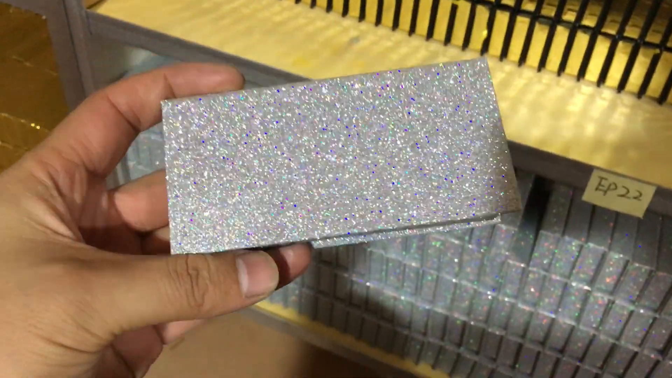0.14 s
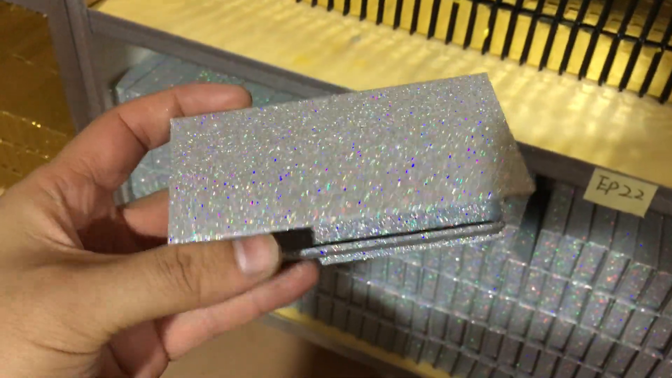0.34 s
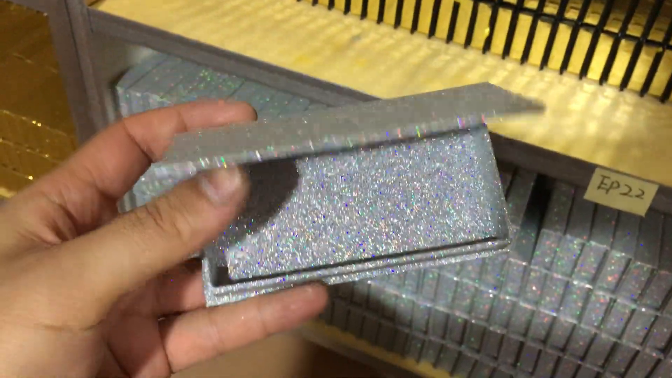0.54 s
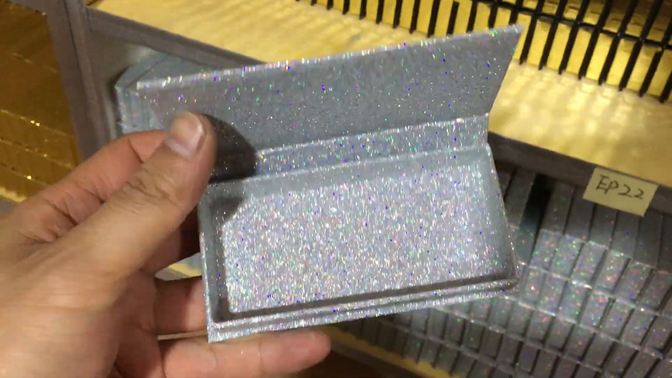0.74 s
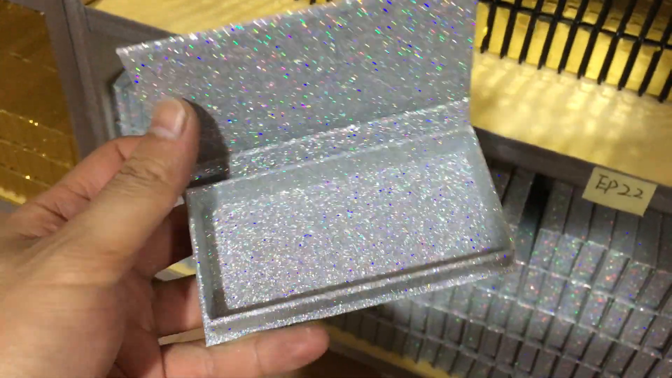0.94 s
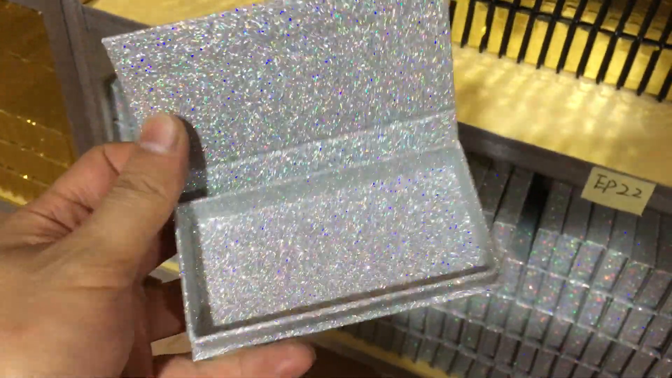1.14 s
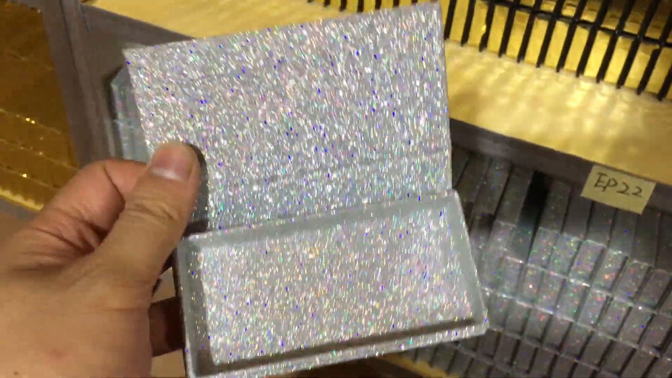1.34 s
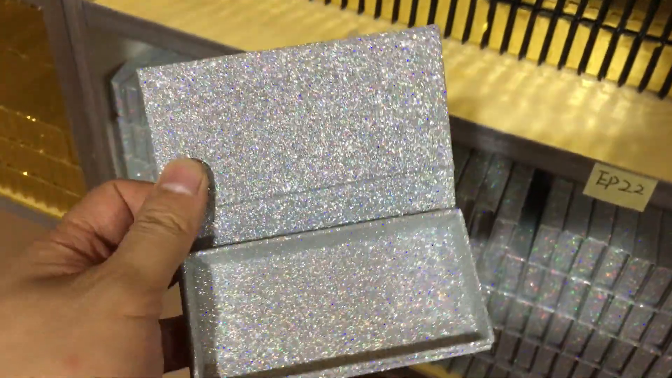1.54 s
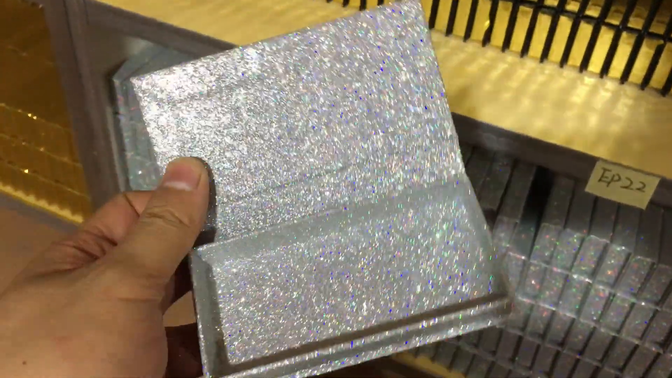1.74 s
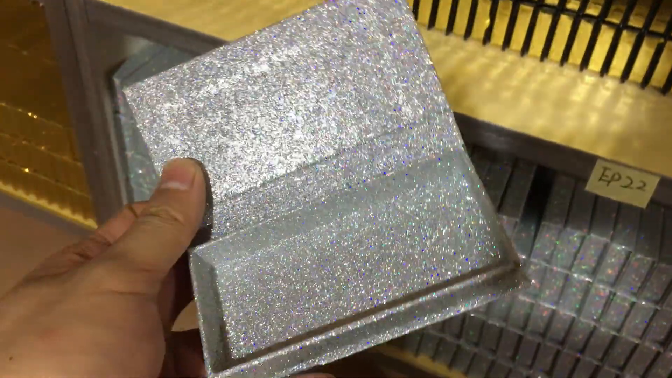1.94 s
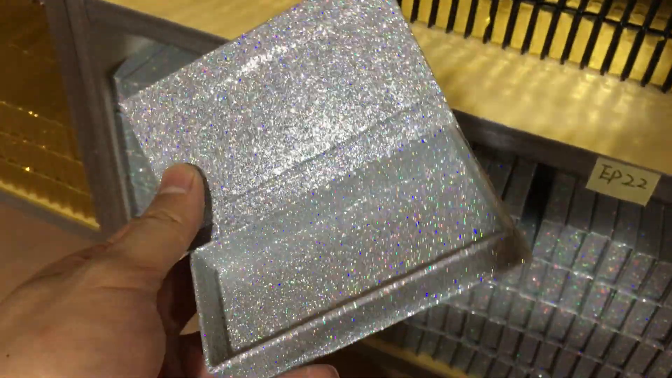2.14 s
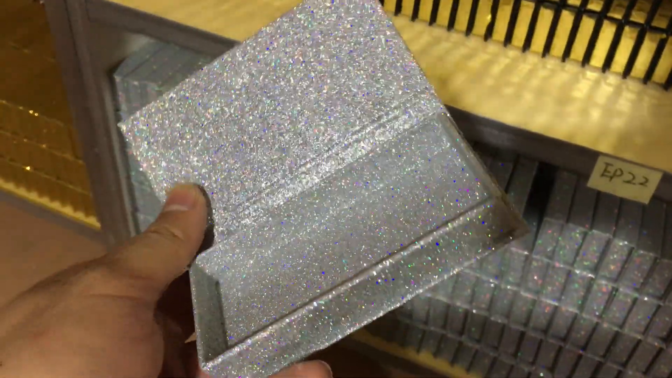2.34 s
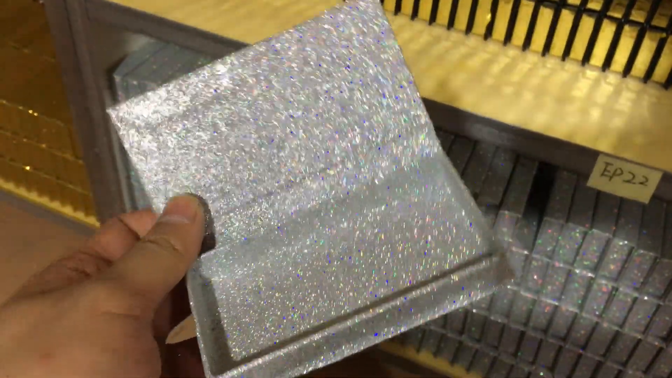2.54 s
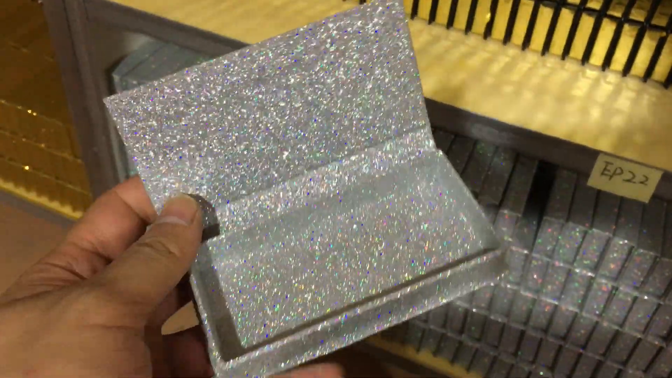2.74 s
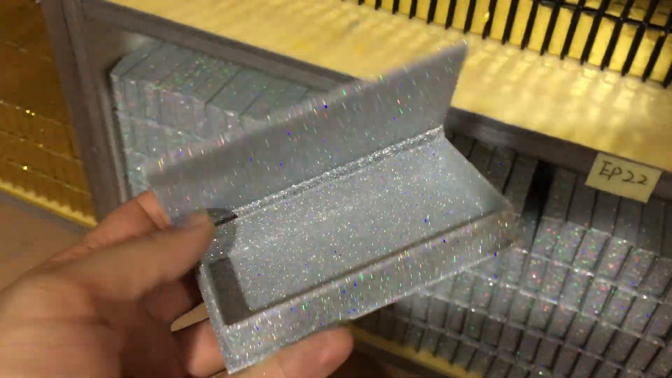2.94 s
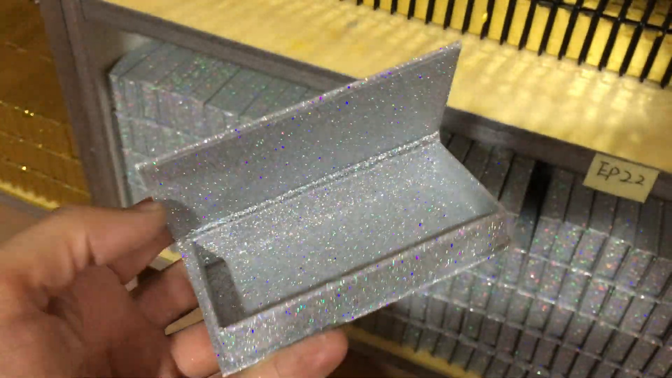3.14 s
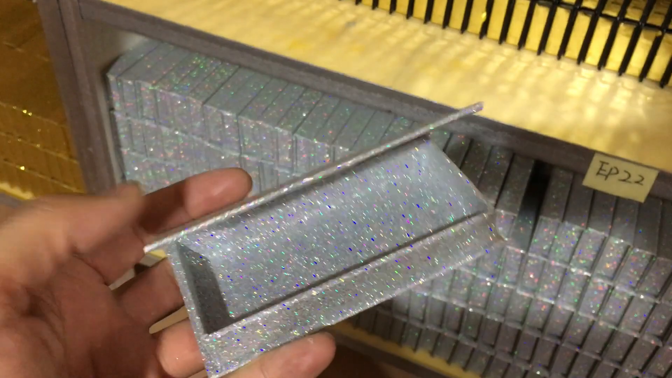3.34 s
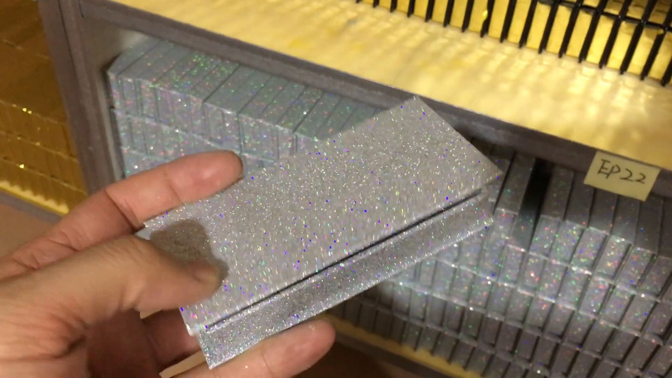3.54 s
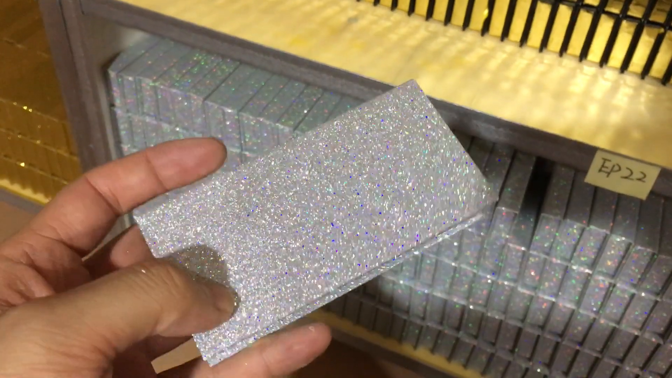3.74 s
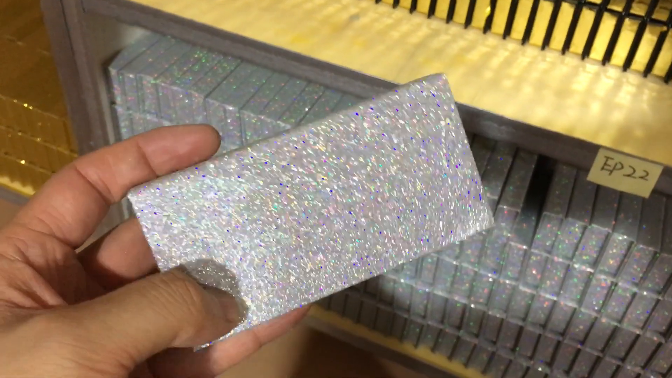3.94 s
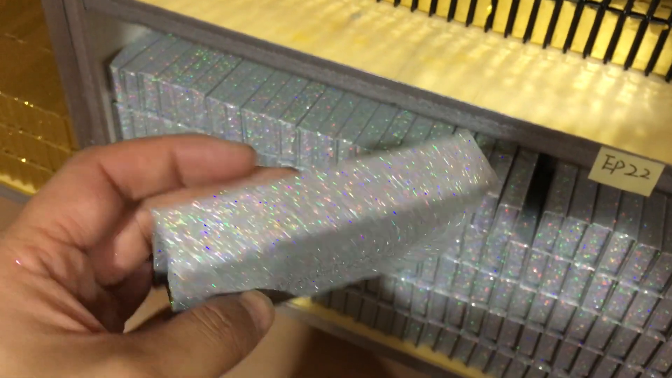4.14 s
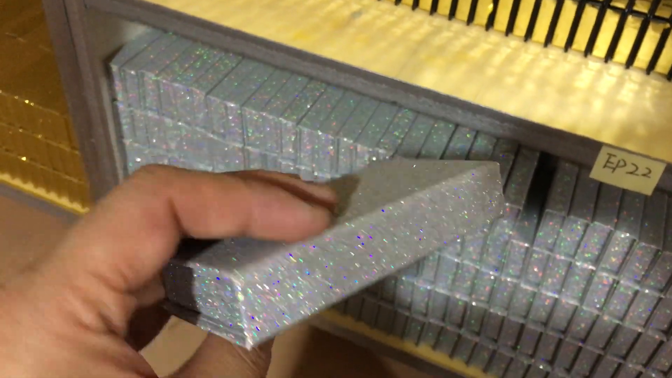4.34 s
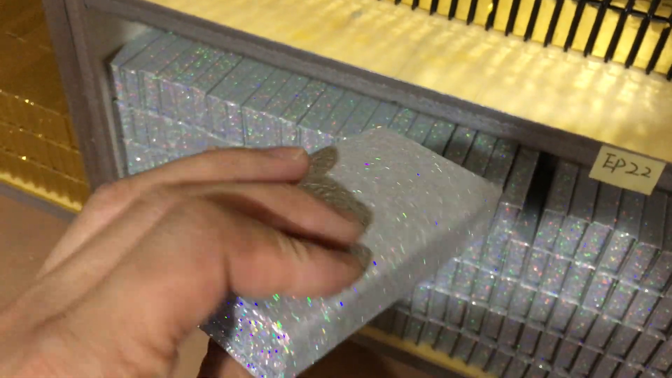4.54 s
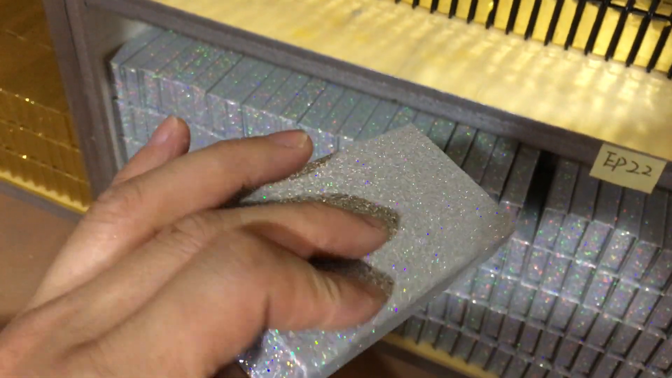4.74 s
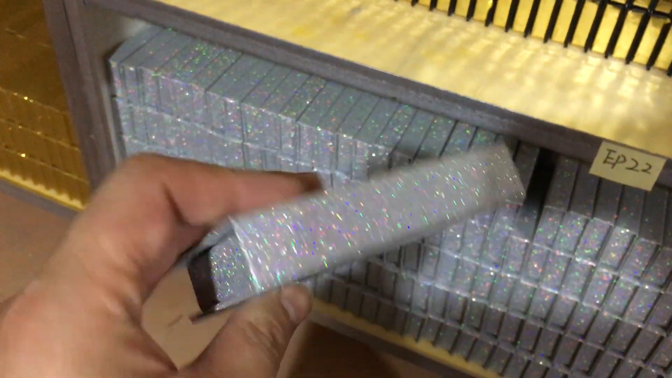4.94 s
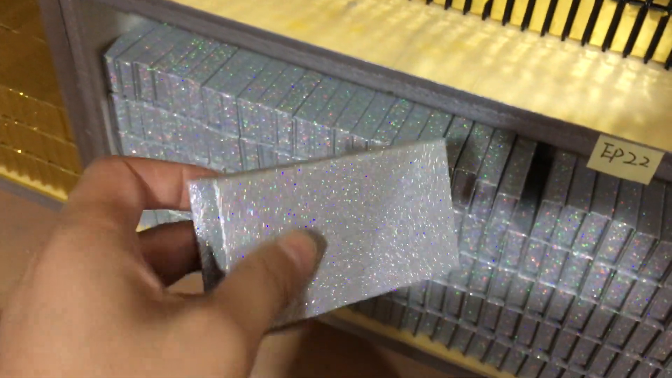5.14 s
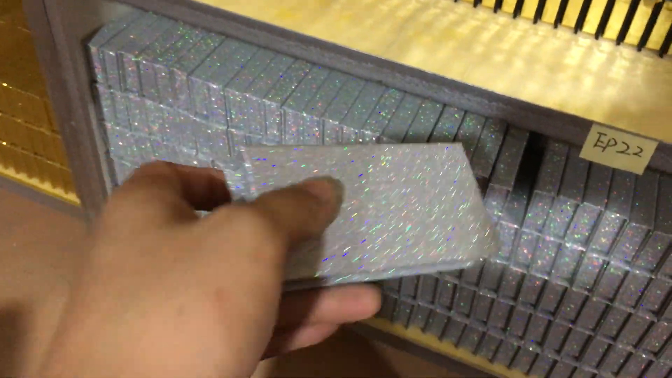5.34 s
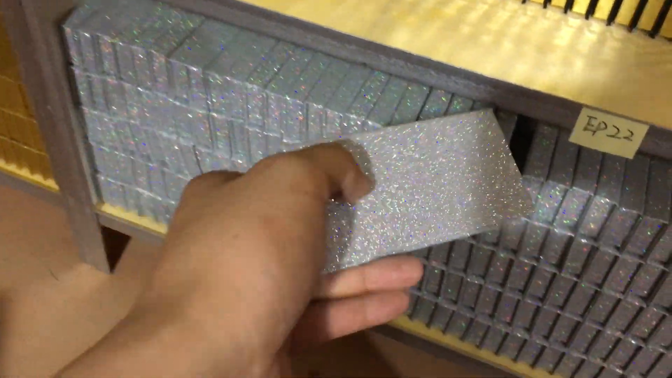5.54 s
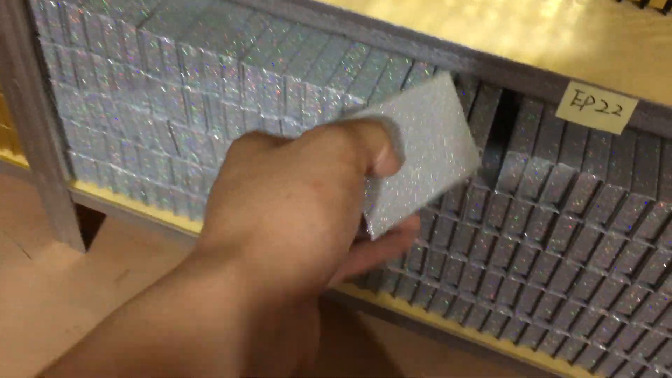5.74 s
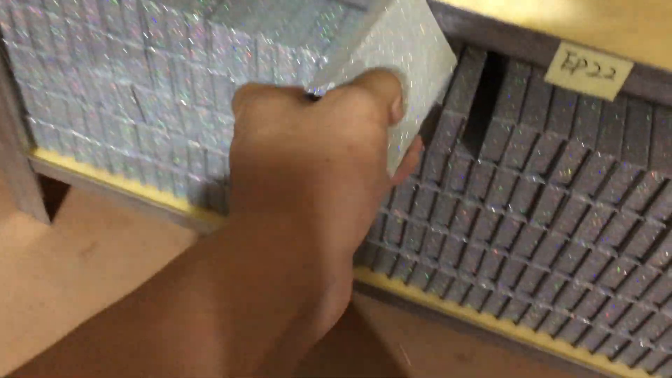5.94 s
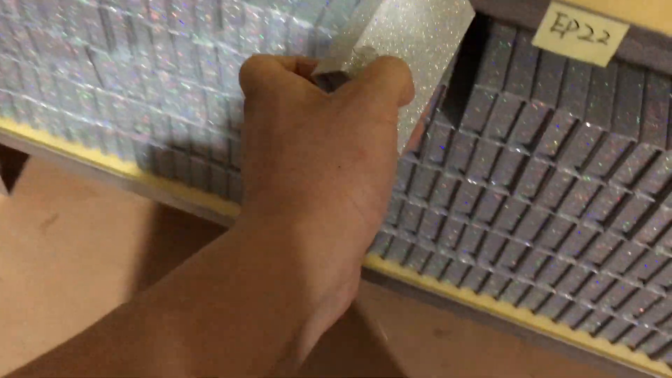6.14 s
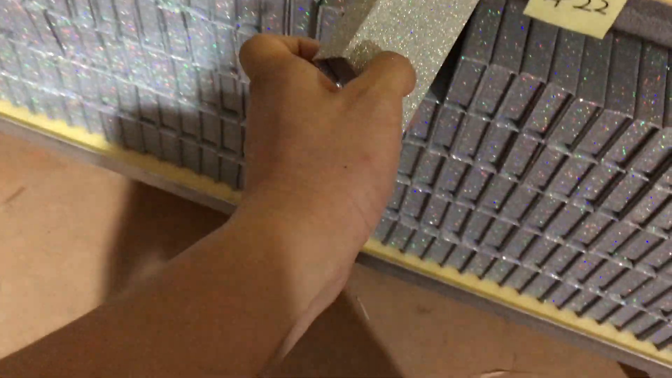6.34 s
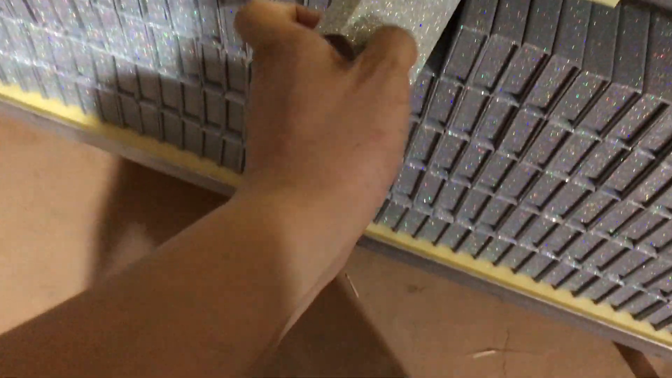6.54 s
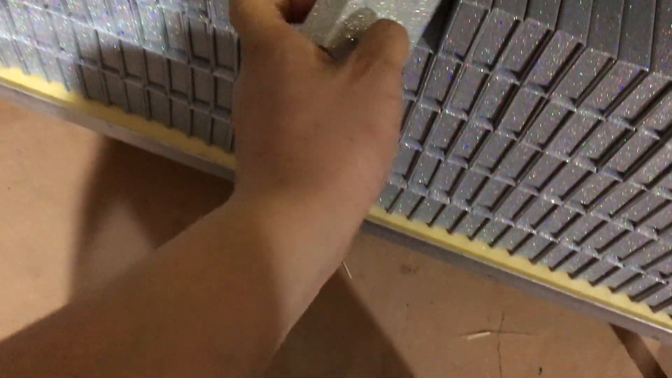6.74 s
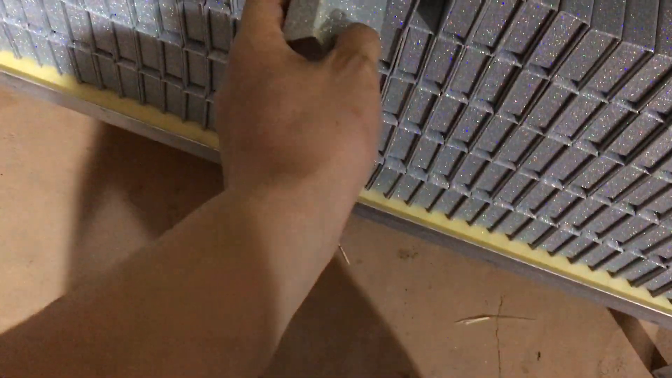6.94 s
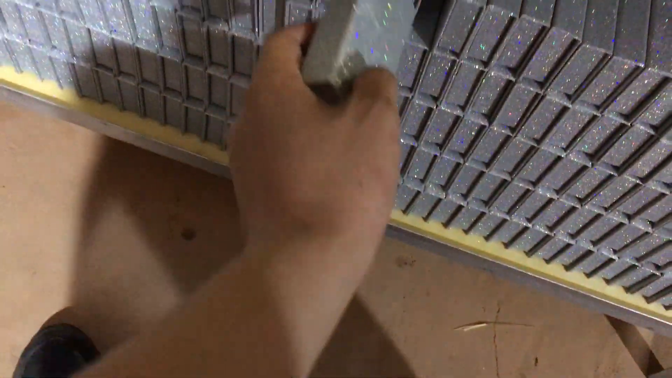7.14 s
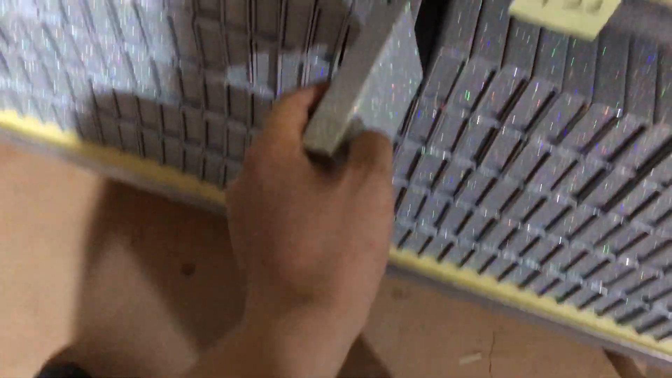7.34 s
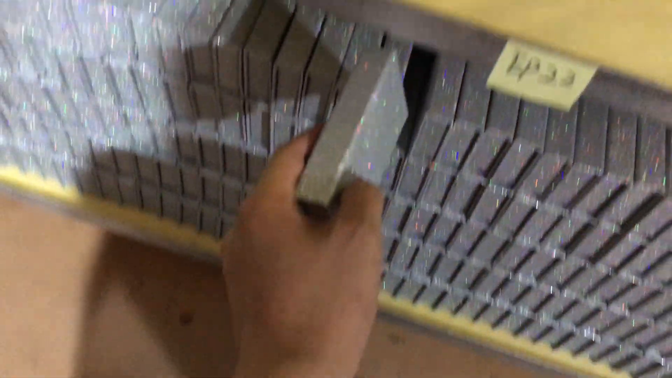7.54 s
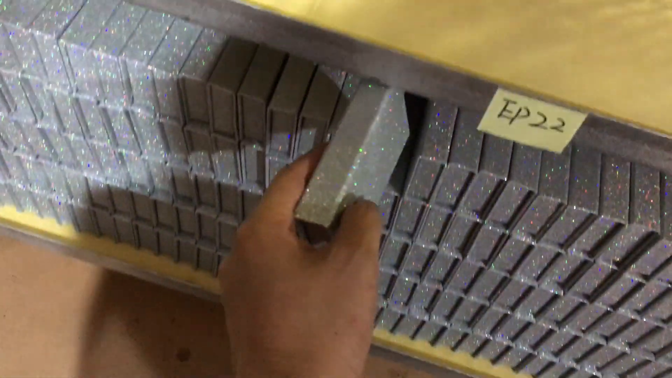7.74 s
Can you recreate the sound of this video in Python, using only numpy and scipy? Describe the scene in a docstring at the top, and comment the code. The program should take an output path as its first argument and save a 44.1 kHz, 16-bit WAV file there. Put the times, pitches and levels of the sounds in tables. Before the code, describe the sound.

Close and dry, fingers rub a small glitter-coated cardboard box with short raspy scuffs and light ticks. The lid closes with one loud hollow snap, followed by dull fingertip knocks and judders. Then, farther off in a reverberant storage aisle, a creak ratchets faster and breaks into single sharp cracks, while the box bumps and briefly scrapes into a packed stack. A faint low rumble and air noise lie beneath.

```python
"""Fingers rub and judder on a small glitter-coated cardboard box: catches of friction excite board and grain.
The box is opened, snapped shut, turned in the hand and pushed back into a packed shelf; blows ring its modes.
After a distant tick, something at the shelf creaks by stick and slip: slips quicken, then slow to single cracks.
A low rumble, a narrow tone of wavering phase and level, runs under steady air noise."""
import sys
import numpy as np
from scipy import signal
from scipy.fft import rfft, irfft
from scipy.io import wavfile
from scipy.ndimage import uniform_filter1d

SR = 44100
rng = np.random.default_rng(int(sys.argv[2]) if len(sys.argv) > 2 else 0)


def dump(signal):
    """Clip the signal to [-1, 1] and save it as 16-bit WAV at the path in sys.argv[1]."""
    limited = np.clip(np.atleast_2d(signal).T, -1, 1)
    pcm = np.round(limited * 32767).astype(np.int16)
    wavfile.write(sys.argv[1], SR, pcm)


N = 343539
T = np.arange(N) / SR  # time in s
HZ = np.fft.rfftfreq(N, 1 / SR)

# All levels in the tables are relative; each source sets its own overall gain.
# Strokes of fingers on the box, then soft scuffs of the box as it slides:
# [fastest_s, rise_s, fall_s, board_level_db, hiss_level_db, board_centre_hz]
RUB_STROKES = [(0.35, .014, 0.009, -57.5, -66, 1510), (0.399, 0.015, 0.0097, -53, -62.5, 1580),
               (0.432, .005, .015, -54, -69, 1600), (0.471, 0.039, 0.075, -53.5, -59, 1440),
               (0.56, 0.06, 0.26, -63.5, -70, 1600), (0.772, 0.067, 0.05, -61.5, -57.5, 1470),
               (0.82, 0.015, 0.044, -61, -58.5, 1160), (0.9, 0.034, 0.15, -65.5, -65, 1500),
               (1.065, 0.074, .03, -62.5, -61, 1650), (1.099, 0.017, 0.017, -49.5, -52, 1770),
               (1.178, 0.038, 0.034, -79, -55.5, 1570), (1.253, 0.015, 0.032, -60.5, -58, 1450),
               (2.16, 0.035, 0.15, -71, -73.5, 915), (2.322, 0.038, 0.032, -70.5, -65, 1130),
               (2.43, 0.095, 0.18, -74, -71, 1200), (2.66, 0.079, 0.14, -56.5, -59.5, 1700),
               (2.78, 0.12, 0.49, -62.5, -86, 1470), (2.925, 0.044, 0.056, -54, -62.5, 1550),
               (2.963, 0.034, 0.045, -58.5, -57.5, 990), (3.052, 0.025, 0.14, -56.5, -66, 1120),
               (3.2, 0.07, 0.036, -68.5, -68, 1210), (3.333, 0.021, 0.011, -52, -54.5, 1040),
               (3.89, 0.033, 0.044, -67, -56.5, 1300), (3.929, 0.032, 0.059, -55.5, -60, 1050),
               (4.088, 0.026, .055, -50.5, -64, 894), (4.18, 0.083, 0.055, -46.5, -61, 945),
               (4.272, 0.023, 0.0099, -59, -60, 1070), (4.483, 0.032, .018, -66, -64.5, 935),
               (4.547, .018, 0.031, -47, -50, 1140), (4.66, 0.015, 0.027, -54.5, -59, 950),
               (4.695, 0.047, 0.037, -66, -59.5, 1075), (4.97, 0.079, 0.26, -78, -72, 950),
               (5.1, 0.051, 0.075, -68.5, -62.5, 1060), (5.222, .04, 0.058, -57, -52.5, 990),
               (5.305, 0.054, 0.048, -53.5, -55.5, 1050), (6.06, 0.078, 0.11, -67, -62.5, 780),
               (6.145, 0.0069, 0.086, -53.5, -65, 950), (6.272, 0.026, 0.014, -54, -65.5, 880),
               (7.22, 0.18, .1, -79, -72.5, 906), (7.328, 0.034, 0.027, -53, -65, 860),
               (7.54, 0.62, 0.23, -67, -65.5, 900)]
# Spectrum of the rubbed board: [frequency_hz, level_db]
BOARD_SPECTRUM = [(60, -25), (170, -14), (320, -3), (520, 5.5), (900, 2.5), (2100, -1), (2800, -21.5),
                  (3800, -9), (6000, -35)]
# Spectrum of the hissing glitter grains: [frequency_hz, level_db]
GLITTER_SPECTRUM = [(1500, -7.5), (3000, 0), (4200, -2.5), (5200, -5), (6500, -4), (7600, -8.5), (9200, -7),
                    (10600, -17), (12000, -10), (16000, -29)]
# Finest hiss of the outer coating: [frequency_hz, level_db]
FIZZ_SPECTRUM = [(7000, -26), (11000, -1), (14500, -4), (16000, 4)]
# Strokes of the box scraping in between its neighbours: [fastest_s, rise_s, fall_s, board_level_db, hiss_level_db]
SHOVE_STROKES = [(6.836, 0.034, 0.046, -36.5, -43), (6.872, 0.0066, 0.036, -36, -41.5),
                 (6.907, 0.0088, 0.013, -34.5, -35)]
# Spectrum of the shaken stack: [frequency_hz, level_db]
STACK_SPECTRUM = [(59, -49), (100, -27), (174, 4), (264, -19), (314, -10), (530, -15.5), (649, -6.5),
                  (708, -11.5), (807, 3), (989, -20), (1060, -8), (2160, -12.5), (2890, -32), (3200, -45),
                  (4160, -58), (7040, -120)]
# Spectrum of the hiss between box and stack: [frequency_hz, level_db]
STACK_HISS_SPECTRUM = [(1760, -24), (3000, -14), (3330, 7.5), (4110, -5.5), (4600, 2), (7780, -10.5),
                       (9140, -3), (10300, -12), (11500, -6), (14400, -20), (16000, -20)]
# Thin resonances of the grinding edges: [frequency_hz, width_hz, level_db]
EDGE_RESONANCES = [(3080, 38, -11), (3390, 65, 0), (4535, 107, 4), (5150, 74, -6), (6540, 82, -13)]
# Lid snapping shut, nail ticks and fingertip knocks: [start_s, peak_level_db, treble_share_db]
TAP_BLOWS = [(0.428, -47, 0), (0.576, -49, 3), (0.674, -51, 0), (0.814, -41.5, -12), (1.007, -43.5, -0.5),
             (1.091, -40.5, 0), (1.244, -45, -1), (2.117, -53.5, -4), (2.425, -48, 0), (3.036, -44, -7),
             (3.323, -34, -2.5), (3.335, -34.5, 0), (3.481, -47, 0), (3.704, -8.5, -6), (4.065, -33.5, -29),
             (4.082, -30.5, -28), (4.17, -27.5, -32), (4.217, -34, -12), (4.293, -54, 0), (4.364, -41, -2),
             (4.427, -45, -5)]
# Spells of soft fingertip slips as the grip shifts: [start_s, end_s, mean_rate_per_s, peak_level_db]
JUDDER_SPELLS = [(1.802, 2.12, 13, -60.5), (4.091, 4.21, 65, -40), (4.369, 4.51, 35, -53)]
# Modes of the hollow box: [frequency_hz, level_db, t60_s]
BOX_MODES = [(255, -9.5, 0.064), (360, -9, 0.048), (703, 4.5, 0.028), (880, 7.5, 0.02), (1080, -12.5, 0.12),
             (1300, 1, 0.0021), (1700, -6, 0.024), (1930, -18, 0.018), (2300, 5.5, 0.003),
             (3036, -3.5, 0.012), (3590, 0, 0.01), (3740, -0.5, 0.014), (5200, -27, 0.0028),
             (6000, -14, 0.0066), (7350, -8, 0.0017), (9410, -33, 0.0041)]
# Contact spectrum of two coated edges: [frequency_hz, level_db]
CRUNCH_SPECTRUM = [(80, -44.5), (250, -8), (1000, 11.5), (1500, 3), (2500, -5.5), (3700, -7), (4500, -10),
                   (7000, -20.5), (16000, -46)]
# Bumps of hand and box against the stack: [start_s, peak_level_db, t60_s, centre_hz]
BUMP_BLOWS = [(0.819, -43.5, 0.12, 328), (1.124, -44.5, 0.058, 247), (1.139, -44, 0.1, 282),
              (2.303, -54, 0.063, 299), (5.114, -52.5, 0.16, 244), (5.239, -39.5, 0.053, 267),
              (6.043, -34, 0.058, 676), (6.095, -37.5, 0.023, 680), (6.14, -32.5, 0.091, 885),
              (6.249, -38, 0.1, 556), (6.606, -23, 0.18, 442), (6.632, -31.5, 0.14, 330),
              (6.827, -30, 0.099, 760), (6.914, -22, 0.061, 880)]
# Spectrum of a bump about its centre: [multiple_of_centre, level_db]
THUD_SPECTRUM = [(.1, -27.5), (.3, -9), (.5, -9), (1, -1), (1.6, -14.5), (2.3, -12.5), (4, -23.5),
                 (12, -51.5)]
# A distant tick, then the single cracks of the creak: [start_s, peak_level_db, treble_share_db]
TICK_AND_CRACKS = [(1.718, -46, -11), (5.397, -36.5, -10), (5.611, -30.5, -9.5), (5.634, -29.5, -9.5),
                   (5.671, -27, -9), (5.782, -24.5, -8.5), (5.832, -23.5, -9), (5.918, -20.5, -8.5),
                   (6.284, -17.5, -8), (6.488, -17, -7), (6.676, -18.5, -6)]
# Spectrum of one tick or crack: [frequency_hz, level_db]
CREAK_SPECTRUM = [(60, -37), (250, -11), (600, -12.5), (1000, -4), (1400, 1), (2500, -4), (3000, -7.5),
                  (4200, -12), (5900, -10.5), (6900, -13.5), (7700, -25), (9000, -14.5), (10300, -23.5),
                  (16000, -30)]
# Modes of the shelf: [frequency_hz, level_db, t60_s]
SHELF_MODES = [(715, -6, 0.14), (922, -10, 0.34), (1320, -0.5, 0.26), (1490, -27, .04), (1770, -12, .04),
               (2000, 2.5, 0.12), (2420, 11, 0.025)]
# Echoes of the aisle: [frequency_hz, t60_s, level_db]
AISLE_ECHOES = [(199, 0.85, -3), (530, 0.58, -4), (1600, 0.54, -2.5), (3680, 0.56, -3.5),
                (9700, 0.47, -3.5)]
# Spectrum of the air noise: [frequency_hz, level_db]
AIR_SPECTRUM = [(15, -51), (26, -32.5), (38, -3.5), (70, -10), (130, -16.5), (210, -16), (300, -18.5),
                (400, -28.5), (1000, -32.5), (1600, -32.5), (2900, -38), (3450, -35), (4000, -39),
                (16000, -46)]
# Level of the rumble over time: [time_s, level_db]
RUMBLE_LEVEL = [(0, -69), (0.5, -66), (0.85, -66), (1.1, -58.5), (1.65, -59.5), (2.1, -63), (2.75, -63.3),
                (3.3, -67.5), (4.1, -70), (4.5, -67), (5.1, -69.5), (5.7, -74.5), (6.3, -65.5), (7.79, -61)]

# A stroke is this much quieter one rise before and one fall after its peak; curve 2 = rounded, 1 = pointed
STROKE_DROP_DB, STROKE_CURVE = 13.5, 1.46
JUDDER_SPREAD_DB, JUDDER_TREBLE_DB = 2.5, -29
# The creak's ratchet: its slips come ever sooner, harder and brighter
RATCHET_START_S, RATCHET_GAP_S = 5.422, .0185
RATCHET_QUICKENING = .964  # each gap as a share of the one before
RATCHET_DB, RATCHET_GROWTH_DB = -43.5, .95  # relative level of the first slip, and gain from slip to slip
RATCHET_TREBLE_DB, RATCHET_BRIGHTENING_DB = -25.5, 1.1  # treble share of the first slip, and gain per slip
EDGE_HZ = 15900  # upper edge of the band


def rubs(overtone=1.92, overtone_db=-9, flat_db=-6, hollow_db=-5, snag_db=-13, hiss_db=-1, fizz_db=-10):
    """Sliding friction: grains hiss, the board resonates in two modes of moving pitch, the hollow box answers."""
    fine = friction(per_s=7000, spread_db=1.5, clump_db=2.0, clump_hz=146.4)
    snags = friction(per_s=140, spread_db=3.0, clump_db=-1.5, clump_hz=8.6)  # sparse catches of larger flakes
    catches = unit(fine) + amp(snag_db) * unit(snags)

    flat_board = tint(catches, BOARD_SPECTRUM)
    strokes = np.array(RUB_STROKES)
    board_hz = np.interp(T, strokes[:, 0], strokes[:, 5])
    modes = resonate(flat_board, board_hz, width_hz=830)
    modes = modes + amp(overtone_db) * resonate(flat_board, overtone * board_hz, width_hz=1800)

    # the box sounds hollow when it is shut, which is when the board's pitch is low
    shut = np.interp(board_hz, [950, 1400], [1, 0])
    hollow = unit(signal.fftconvolve(catches, ring(BOX_MODES, T[:SR // 8]))[:N])
    board = unit(modes + amp(flat_db) * flat_board + amp(hollow_db) * shut * hollow)

    hiss = tint(catches, GLITTER_SPECTRUM) + amp(fizz_db) * shut * tint(catches, FIZZ_SPECTRUM)
    board_part = board * stroke_gain(RUB_STROKES, column=3)
    return board_part + amp(hiss_db) * hiss * stroke_gain(RUB_STROKES, column=4)


def taps(level_db=-2, settle_s=.001, crunch_db=-6, crunch_t60_s=0.037, room_db=-18):
    """Impact excitation: a blow crunches the coating and rings the box's modes, brighter for a harder contact."""
    out, t = np.zeros(N), T[:SR // 2]
    body = unit(ring(BOX_MODES, t))
    for start_s, peak_db, treble_db in TAP_BLOWS + judders():
        contact = (t == 0) + rattle(t, crunch_t60_s)
        crunch = unit(causal(contact, CRUNCH_SPECTRUM))
        room = unit(causal(echoes(), CRUNCH_SPECTRUM))
        blow = body + amp(crunch_db) * crunch + amp(room_db) * room
        add(out, start_s + settle_s, amp(peak_db) * brighten(blow, treble_db, split_hz=1710))
    return amp(level_db) * out


def judders(max_count=24):
    """Stick-slip of a fingertip: dull slips uneven in time and strength, as rows like those of TAP_BLOWS."""
    slips = []
    for start_s, end_s, per_s, peak_db in JUDDER_SPELLS:
        late = rng.random(max_count)
        force = rng.standard_normal(max_count)
        times = start_s + (np.arange(max_count) + late) / per_s
        for s, f in zip(times, force):
            if s < end_s:
                slips.append((s, peak_db + JUDDER_SPREAD_DB * f, JUDDER_TREBLE_DB))
    return slips


def shove(hiss_db=-0.5, rings_db=-13):
    """Coarse friction between boxes: the catches shake the whole stack and excite thin resonances of the edges."""
    catches = friction(per_s=4000, spread_db=2.5, clump_db=1.5, clump_hz=197)
    rings = np.zeros(N)
    for hz, width_hz, db in EDGE_RESONANCES:
        rings += amp(db) * resonate(catches, np.full(N, hz), width_hz)
    hiss = amp(hiss_db) * tint(catches, STACK_HISS_SPECTRUM) + amp(rings_db) * unit(rings)
    stack = tint(catches, STACK_SPECTRUM)
    return stack * stroke_gain(SHOVE_STROKES, column=3) + hiss * stroke_gain(SHOVE_STROKES, column=4)


def bumps(level_db=-1, shudder_db=3, settle_s=0.002075):
    """Damped impact: a padded blow is one push, then a dull shudder that dies quickly."""
    out, t = np.zeros(N), T[:SR // 4]
    for start_s, peak_db, t60_s, centre_hz in BUMP_BLOWS:
        push = (t == 0) + amp(shudder_db) * rattle(t, t60_s)
        thud = causal(push, np.array(THUD_SPECTRUM) * [centre_hz, 1])
        add(out, start_s + settle_s, amp(peak_db) * thud / abs(thud).max())
    return amp(level_db) * out


def tick_and_creak(lead_s=.002, give_db=-13, rattle_db=4, rattle_t60_s=0.068, modes_db=-7, room_db=2):
    """Stick and slip: a faint, bright give, then a crack that scatters, rings modes and echoes; so does the tick."""
    out, t = np.zeros(N), T[:SR // 2]
    modes = unit(ring(SHELF_MODES, t))
    frame = rattle(t, rattle_t60_s)  # this part of the scatter is the same for every row
    for start_s, peak_db, treble_db in TICK_AND_CRACKS + ratchet():
        scatter = frame + rattle(t, rattle_t60_s)
        paths = (t == 0) + amp(rattle_db) * scatter + amp(room_db) * echoes()
        crack = unit(causal(paths, CREAK_SPECTRUM)) + amp(modes_db) * modes
        give = brighten(crack[:SR // 100], share_db=-1.5, split_hz=3100)
        add(out, start_s, amp(peak_db + give_db) * give)
        add(out, start_s + lead_s, amp(peak_db) * brighten(crack, treble_db, split_hz=2800))
    return out


def ratchet(count=12):
    """Repeated stick-slip under a growing push: gaps shrink geometrically; rows like those of TICK_AND_CRACKS."""
    k = np.arange(count)
    elapsed_gaps = (1 - RATCHET_QUICKENING ** k) / (1 - RATCHET_QUICKENING)
    times = RATCHET_START_S + RATCHET_GAP_S * elapsed_gaps
    peaks_db = RATCHET_DB + RATCHET_GROWTH_DB * k
    trebles_db = RATCHET_TREBLE_DB + RATCHET_BRIGHTENING_DB * k
    return list(zip(times, peaks_db, trebles_db))


def rumble_and_air(hum_hz=69, waver_hz=7, waver_rad=0.62, swell_db=3.6, swell_hz=8, hum_db=-1, air_db=-63):
    """Random phase and amplitude modulation: a narrow, wavering rumble over steady air noise."""
    phase = 2 * np.pi * hum_hz * T + waver_rad * wander(waver_hz)
    hum = unit(np.sin(phase) * amp(swell_db * wander(swell_hz)))
    air = amp(air_db) * tint(rng.standard_normal(N), AIR_SPECTRUM)
    return air + hum * amp(hum_db + np.interp(T, *np.transpose(RUMBLE_LEVEL)))


def friction(per_s, spread_db, clump_db, clump_hz):
    """Asperity contact: tiny catches of a rough surface, uneven in size, with clumps of stronger ones."""
    size = amp(spread_db * np.minimum(rng.exponential(1, N), 4)) * rng.choice([-1, 1], N)
    caught = rng.random(N) < per_s / SR
    return size * caught * amp(clump_db * wander(clump_hz))


def stroke_gain(strokes, column):
    """Friction power follows the stroke: each swells to its fastest moment and dies away; powers add."""
    power = np.zeros(N)
    for row in strokes:
        fastest_s, rise_s, fall_s = row[:3]
        t = np.arange(-min(4 * rise_s, fastest_s), 4 * fall_s, 1 / SR)
        away = np.maximum(-t / rise_s, t / fall_s)
        level_db = row[column] - STROKE_DROP_DB * away ** STROKE_CURVE
        add(power, fastest_s + t[0], amp(level_db) ** 2)
    return np.sqrt(power)


def resonate(x, hz, width_hz):
    """Resonance by heterodyne: shift the curve hz to zero, apply a two-pole low-pass, shift back; rms 1."""
    turn = np.exp(2j * np.pi * np.cumsum(hz) / SR)
    r = np.exp(-np.pi * width_hz / SR)
    shifted = signal.lfilter([(1 - r) ** 2], [1, -2 * r, r * r], x / turn)
    return unit((turn * shifted).real)


def ring(modes, t, bass_hz=170):
    """Modal decay: dying sines, neighbours in opposite senses; a high-pass since little bass radiates."""
    swing = np.zeros(len(t))
    for k, (hz, db, t60_s) in enumerate(modes):
        swing += (-1) ** k * amp(db - 60 * t / t60_s) * np.sin(2 * np.pi * hz * t)
    return signal.sosfilt(signal.butter(4, bass_hz, "high", fs=SR, output="sos"), swing)


def rattle(t, t60_s):
    """Exponential decay of a dense cluster of tiny contacts, of energy 1."""
    contacts = rng.choice([-1, 1], len(t)) * amp(-60 * t / t60_s)
    return contacts / np.linalg.norm(contacts)


def brighten(x, share_db, split_hz):
    """Contact stiffness: a harder blow puts more power above split_hz; the result peaks near 1."""
    low = signal.sosfilt(signal.butter(3, split_hz, fs=SR, output="sos"), x)
    high = signal.sosfilt(signal.butter(3, split_hz, "high", fs=SR, output="sos"), x)
    share = np.clip(amp(share_db) ** 2, 0, .9)
    out = np.sqrt(1 - share) * unit(low) + np.sqrt(share) * unit(high)
    loudest_power = uniform_filter1d(out ** 2, size=SR // 200).max()  # over 5 ms
    return out / np.sqrt(2 * np.pi * loudest_power)


def causal(x, points, size=4096):
    """Minimum-phase filtering: colours a blow without smearing its attack backwards."""
    log_gain = np.log(amp(read(points, abs(np.fft.fftfreq(size, 1 / SR)))))
    response = np.fft.ifft(np.exp(np.conj(signal.hilbert(log_gain)))).real
    return signal.fftconvolve(x, response[:size // 2])[:len(x)]


def tint(x, points):
    """Spectral shaping: multiplies the spectrum of a long noise by a gain curve, at rms 1."""
    return unit(irfft(rfft(x) * amp(read(points, HZ)), N))


def wander(hz):
    """Low-passed noise: a slow random signal of rms 1, with a Gaussian roll-off set by hz."""
    return unit(irfft(rfft(rng.standard_normal(N)) * np.exp(-(HZ / hz) ** 2), N))


def echoes(onset_s=0.0039):
    """Diffuse reverberation of the aisle, of energy 1: random arrivals decay at a rate set by frequency."""
    table, t = np.array(AISLE_ECHOES), T[:SR // 2]
    arrived = rng.choice([-1., 1.], len(t)) * (rng.random(len(t)) < 6000 / SR)
    arrivals = arrived * np.clip(t / onset_s - .5, 0, 1)
    hz, late_s, bins = signal.stft(arrivals, SR, nperseg=256)
    level_db = read(table[:, ::2], hz)[:, None]
    t60_s = read(table[:, :2], hz)[:, None]
    decayed = bins * amp(level_db - 60 * late_s / t60_s)
    tail = signal.istft(decayed, SR, nperseg=256)[1][:len(t)]
    return tail / np.linalg.norm(tail)


def amp(db):
    """Decibel law: level to amplitude ratio."""
    return 10 ** (np.asarray(db) / 20)


def unit(x):
    """Normalisation of mean power: scales to rms 1."""
    return x / np.sqrt(np.mean(x ** 2) + 1e-20)


def read(points, hz):
    """Interpolation of a spectrum by straight lines on a log-frequency axis."""
    f, value = np.transpose(points)
    return np.interp(np.log(hz + 1), np.log(f + 1), value)


def add(mix, start_s, sound):
    """Superposition: sums a sound into the mix in place, cut at the end of the mix."""
    part = mix[max(round(start_s * SR), 0):][:len(sound)]
    part += sound[:len(part)]


def scene():
    """Direct and reverberant fields: the box is close and dry; the shelf is farther off and wetter."""
    handling = rubs() + shove() + bumps()
    aisle = amp(-16.5) * signal.fftconvolve(handling, echoes())[:N]
    return (handling + aisle + tick_and_creak() + rumble_and_air() + taps())[None]


def record(dry):
    """Band limitation: a linear-phase low-pass filter ends the spectrum near EDGE_HZ."""
    low_pass = signal.firwin(511, EDGE_HZ, window=("kaiser", 9), fs=SR)
    return signal.oaconvolve(dry, low_pass[None], "same")


dry = scene()
out = record(dry)
dump(out)
```